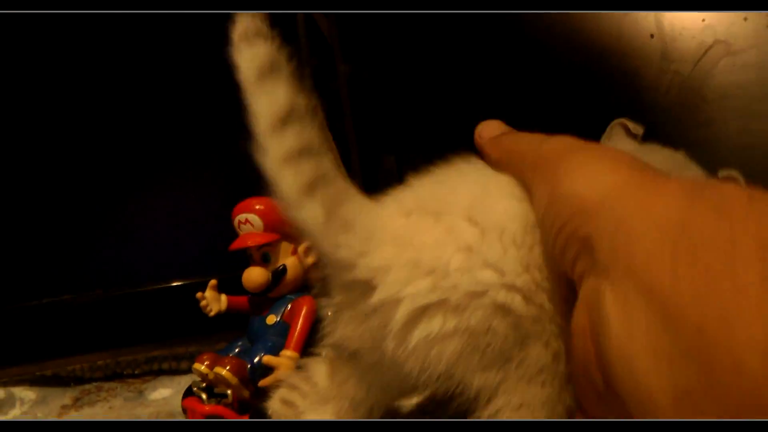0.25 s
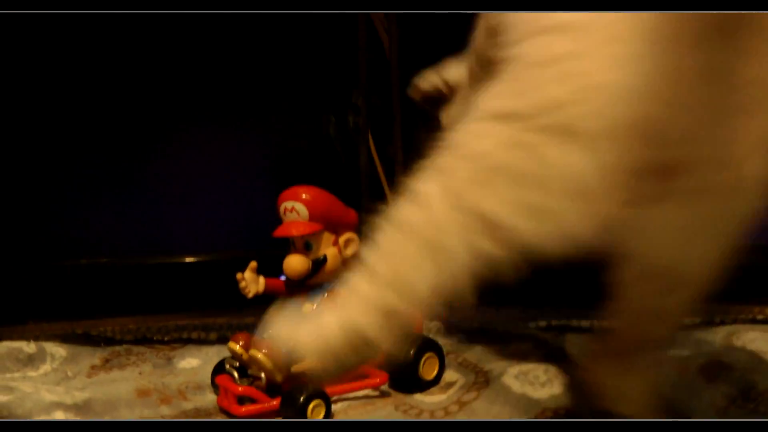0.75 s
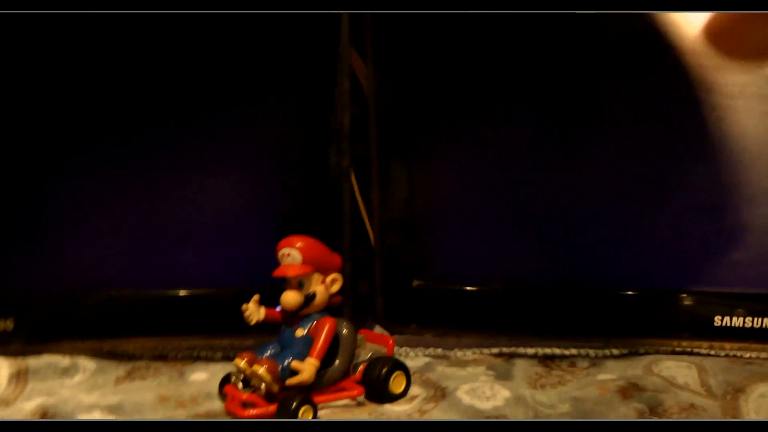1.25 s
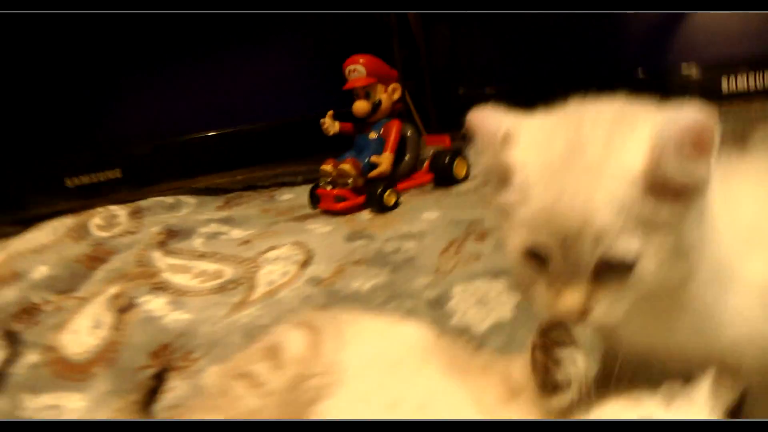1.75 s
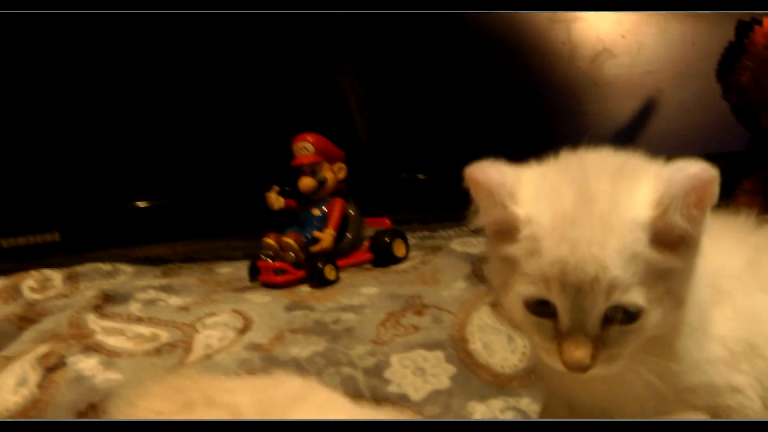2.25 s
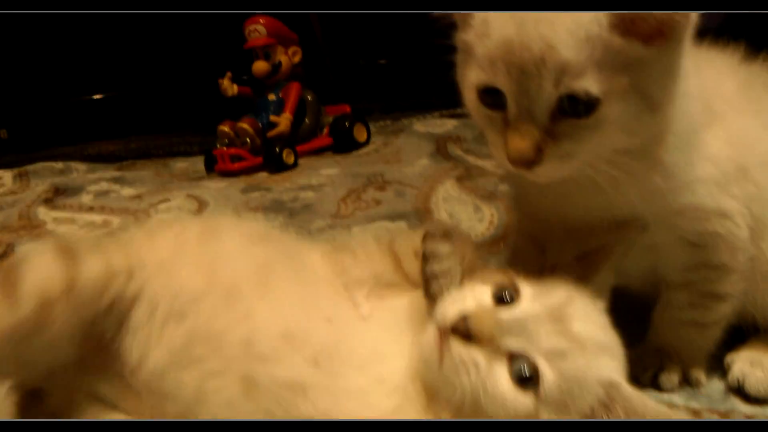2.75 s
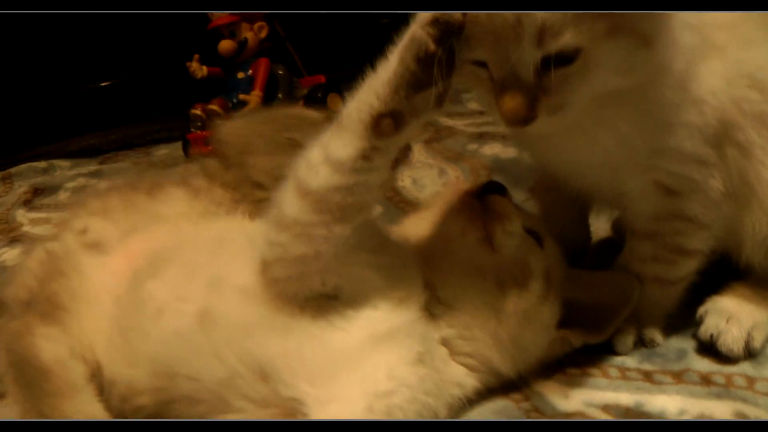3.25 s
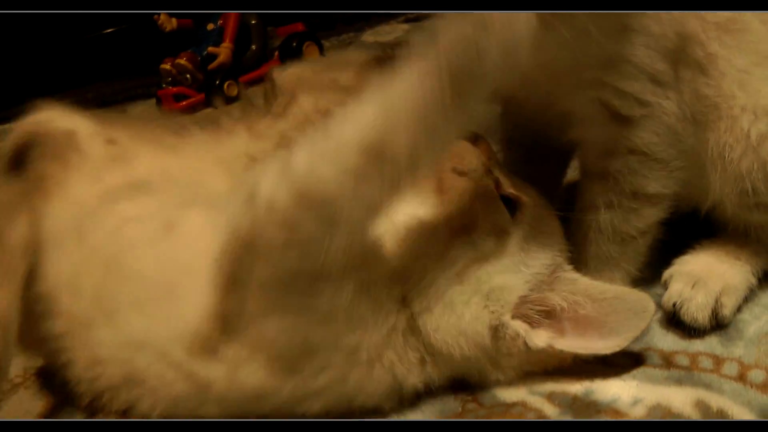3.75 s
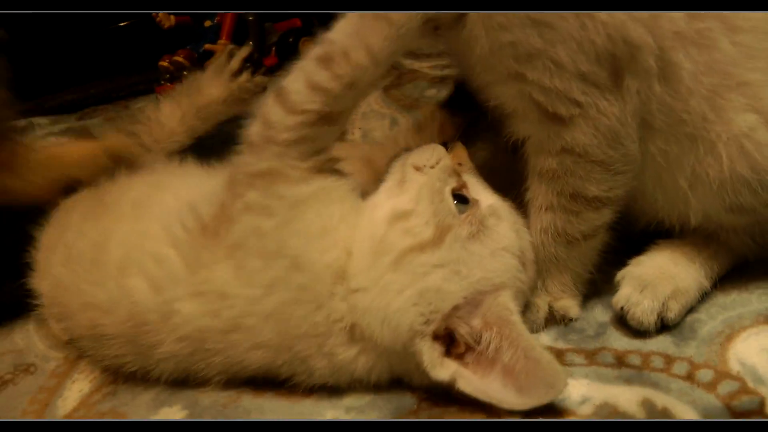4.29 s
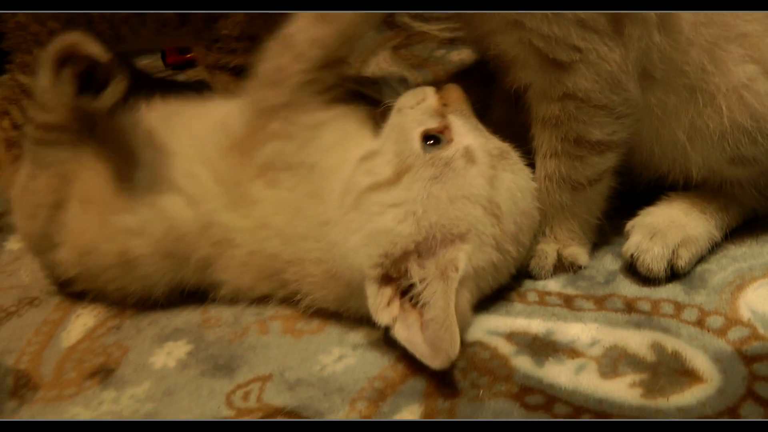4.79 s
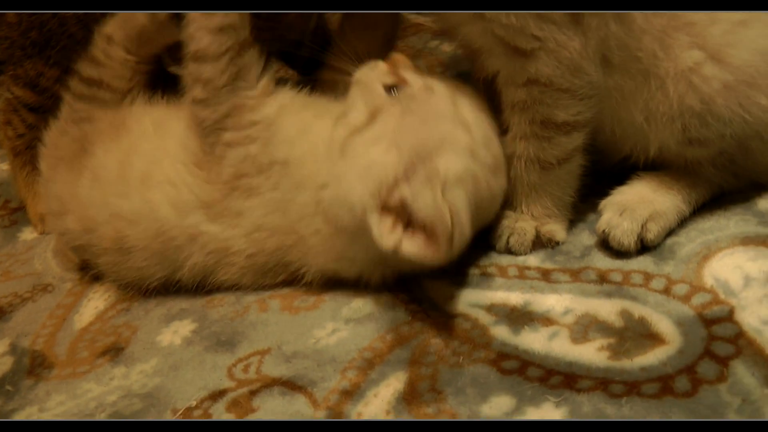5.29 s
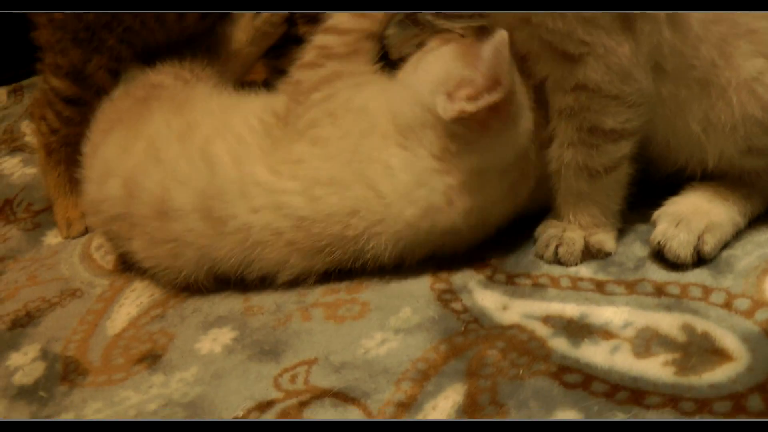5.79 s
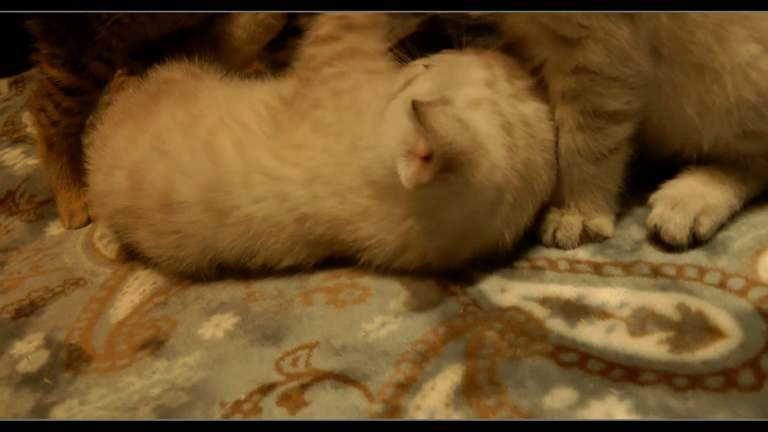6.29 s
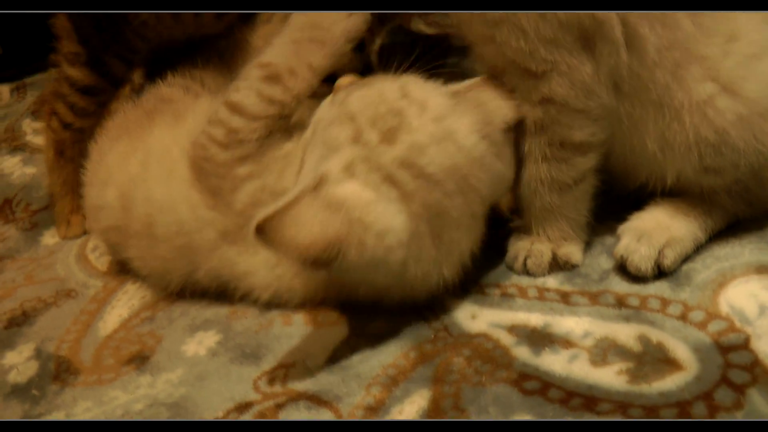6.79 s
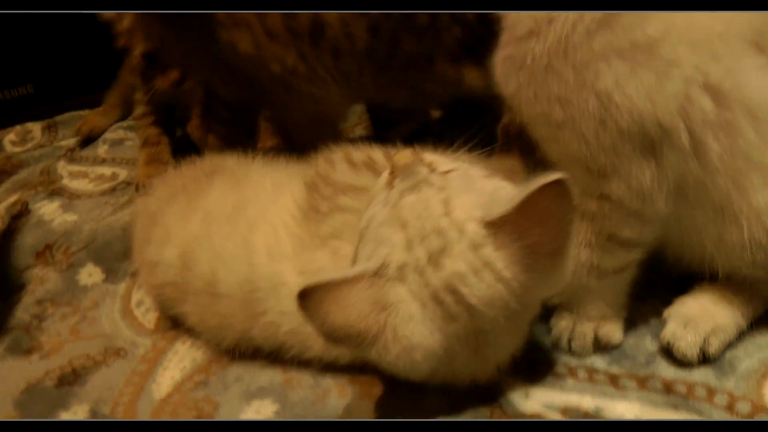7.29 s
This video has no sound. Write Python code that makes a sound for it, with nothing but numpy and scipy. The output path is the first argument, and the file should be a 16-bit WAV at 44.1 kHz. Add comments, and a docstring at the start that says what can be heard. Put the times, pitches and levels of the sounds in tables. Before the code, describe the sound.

Close up in a small room, over a faint steady hiss, soft paw steps end in a dull landing on a bed. A short scrape and two knocks of camera handling follow. Then kittens wrestle on the bedspread, with uneven fur rustles, muffled thumps and little taps. Sharper bursts of claws snagging cloth stand out later and again just before the end.

```python
"""Kittens tussling on a bedspread

In a small room, close to a hand-held camera, bodies thump the mattress and excite its low modes.
Paws and claws strike and catch in short, damped bursts; fur sliding over cloth makes friction noise.
A hand rubs and knocks the camera's shell. A steady hiss lies underneath, and above the bass the
two microphone channels are largely opposed in phase."""
import sys
import numpy as np
from scipy import signal
from scipy.fft import rfft, irfft
from scipy.io import wavfile
from scipy.ndimage import uniform_filter1d

SR = 44100
rng = np.random.default_rng(int(sys.argv[2]) if len(sys.argv) > 2 else 0)


def materialize(psi):
    """Save the field psi as 16-bit PCM at rate SR to the path in sys.argv[1].

    A 1-D psi becomes a single channel; in a 2-D psi each row is a channel.
    """
    bounded = np.clip(np.atleast_2d(psi).T, -1, 1)
    quanta = np.round(bounded * 32767).astype(np.int16)
    wavfile.write(sys.argv[1], SR, quanta)


N = 332514
STROKE_SKEW = 0.67  # below 1, a slide gains speed quickly and slows gradually


def undb(db):
    """Amplitude ratio of a level in decibels."""
    return 10 ** (np.asarray(db) / 20)


def unit(x):
    """Normalisation to an rms of 1."""
    return x / np.sqrt(np.mean(x ** 2) + 1e-18)


def curve(points, size):
    """Interpolation of (frequency_hz, value) points on a log axis, at the bins of a transform."""
    hz, value = np.transpose(points)
    return np.interp(np.log(np.fft.rfftfreq(size, 1 / SR) + 1), np.log(np.sort(hz)), value)


def colour(x, points):
    """Minimum-phase filtering to a given spectral shape; white noise keeps its power."""
    size = 2048
    cepstrum = irfft(np.log(unit(undb(curve(points, size)))))
    cepstrum[1:size // 2] *= 2
    cepstrum[size // 2 + 1:] = 0
    return signal.fftconvolve(x, irfft(np.exp(rfft(cepstrum))))[:len(x)]


def resonate(x, hz, width_hz):
    """A second-order resonance with unit gain at its centre."""
    return signal.lfilter(*signal.iirpeak(hz, hz / width_hz, fs=SR), x)


def fade(t, t60):
    """Exponential decay, by 60 dB in t60 seconds."""
    return np.exp(-np.log(1000) * t / max(t60, 1e-3))


def add(track, start_s, sound):
    """Superposition of a sound on a track."""
    i = max(int(start_s * SR), 0)
    track[i:i + len(sound)] += sound[:max(N - i, 0)]


def grains(size, spread_db):
    """Stick-slip friction: noise whose level scatters from one snag to the next."""
    snags = np.repeat(rng.standard_normal(size // 64 + 1), 64)[:size]
    return unit(rng.standard_normal(size) * undb(spread_db * snags))


def walk(rate_hz):
    """Slow random modulation: smoothed steps with a spread near 1."""
    hold = int(SR / rate_hz)
    steps = np.repeat(rng.standard_normal(N // hold + 1), hold)
    return 1.58 * uniform_filter1d(uniform_filter1d(steps, hold), hold)[:N]


def stroke(length_s, skew):
    """Speed of one sliding movement: a skewed half sine."""
    return np.sin(np.pi * np.linspace(0, 1, max(int(length_s * SR), 8)) ** skew)


def pair(x, balance):
    """Unequal frequency responses of two channels, with a mean power gain of 1."""
    gains = undb(np.array([[.5], [-.5]]) * curve(balance, N))
    return irfft(rfft(x) * gains / np.sqrt(np.mean(gains ** 2, axis=0)), N)


def hiss():
    """Room tone and microphone hiss: a weak in-phase (mid) and a stronger antiphase (side) noise."""
    # frequency_hz, density_db
    mid_spectrum = [(25, -11), (60, -12), (110, -4), (185, 0), (300, -3), (600, -3.5), (1000, -3.5),
                    (2000, -8.5), (4000, -13.5), (7000, -12), (9500, -18), (11600, -22), (12500, -48)]
    side_spectrum = [(25, -11), (60, -9), (130, -9.5), (210, -9.5), (330, -6.5), (520, -0.5), (900, 0),
                     (1500, -5), (2500, -12), (4000, -18), (7000, -23), (11600, -27.5), (12500, -60)]
    # channel balance: frequency_hz, left_minus_right_db
    balance = [(100, -1), (1500, 0.5), (4000, -6), (8500, -9), (11000, -32)]
    mid = unit(colour(rng.standard_normal(N), mid_spectrum)) * undb(-54.03)
    side = unit(colour(rng.standard_normal(N), side_spectrum)) * undb(-46.0 + 0.74 * walk(rate_hz=3.8))
    return pair(np.array([mid + side, mid - side]), balance)


def room(x, early_db, tail_db, t60):
    """Reverberation: early reflections from furniture and a diffuse tail, unique to each microphone."""
    t = np.arange(SR // 2) / SR
    channels = []
    for _ in range(2):
        early = rng.standard_normal(len(t)) * fade(t, 0.08) * (t > .001)
        tail = rng.standard_normal(len(t)) * fade(t, t60) * (t > .008)
        response = undb(early_db) * early / np.linalg.norm(early)
        response += undb(tail_db) * tail / np.linalg.norm(tail)
        channels.append(signal.fftconvolve(x, response)[:N])
    return np.array(channels)


def grip():
    """Forced vibration: sliding skin drives the camera's shell and also hisses into the microphones."""
    # slides of the hand: start_s, length_s, friction_db, direct_relative_db
    slides = [(1.605, 0.067, -46.5, 6), (1.624, 0.22, -61, 13.5), (1.733, 0.071, -33.5, -1),
              (1.745, 0.033, -28, -16), (1.799, 0.15, -60, 13)]
    # shell resonances: centre_hz, width_hz, relative_db
    modes = [(790, 185, -3), (1200, 260, -9), (1395, 300, -5)]
    friction, direct = np.zeros((2, N))
    for start_s, length_s, db, direct_db in slides:
        speed = stroke(length_s, STROKE_SKEW)
        add(friction, start_s, undb(db) * speed * grains(len(speed), spread_db=2.0))
        add(direct, start_s, undb(db + direct_db) * speed * grains(len(speed), spread_db=3.0))
    shell = sum(undb(db) * resonate(resonate(friction, hz, width), hz, width) for hz, width, db in modes)
    return undb(22.0) * shell + direct


def squirm():
    """Amplitude envelope of wriggling: each bout flares up and tires, in uneven jerks."""
    # bouts on the cloth: start_s, length_s, level_db
    bouts = [(1.805, 0.36, -60), (2.55, 0.78, -55), (3.021, 1.64, -47.5), (4.456, 0.69, -54),
             (5.95, 1.14, -54)]
    effort = np.zeros(N)
    for start_s, length_s, db in bouts:
        add(effort, start_s, undb(db) * stroke(length_s, skew=0.43))
    return effort * undb(3.5 * walk(rate_hz=25))


def rustle():
    """Friction noise grows with speed: fur drags the cloth (dull) and plucks its fibres (bright)."""
    # sweeps of fur and paws: start_s, length_s, level_db, treble_relative_db
    sweeps = [(0.611, 0.028, -42.5, -6), (0.884, .09, -71.5, 14), (1.29, .02, -60, 7.5),
              (2.492, 0.066, -40, -14.5), (3.119, 0.21, -41.5, -3), (3.443, 0.13, -53, -3),
              (3.99, 0.036, -49, -5), (4.212, .049, -65, 19), (4.577, 0.029, -58.5, 11),
              (4.826, 0.054, -65, 17), (4.918, 0.053, -51.5, 7.5), (5.203, .12, -43.5, 1),
              (5.432, 0.049, -59.5, 9), (5.662, 0.056, -60, 11.5), (5.754, .026, -41, -9),
              (5.782, 0.031, -35.5, -6), (5.811, 0.021, -43, 10), (5.827, 0.1, -31.5, -5.5),
              (5.96, 0.11, -49.5, -0.5), (6.612, .17, -47.5, -16), (6.772, 0.042, -43.5, -3),
              (7.35, .03, -43, 0), (7.379, 0.13, -55.5, 7), (7.489, .046, -58, 13)]
    # frequency_hz, density_db
    cloth_spectrum = [(60, -17.5), (140, -4), (280, 1.5), (520, -3.5), (750, -3), (1200, -4.5), (2200, -12),
                      (5000, -46), (12000, -36)]
    fibre_spectrum = [(500, -30), (1500, 0.5), (2800, 4.5), (5500, 3), (8000, -4), (12000, -18)]
    drag = squirm()
    pluck = drag * undb(-7)
    for start_s, length_s, db, treble_db in sweeps:
        speed = undb(db) * stroke(length_s, STROKE_SKEW)
        add(drag, start_s, speed)
        add(pluck, start_s, speed * undb(treble_db))
    cloth = colour(drag * grains(N, spread_db=0.0), cloth_spectrum)
    fibres = colour(pluck * grains(N, spread_db=2.0), fibre_spectrum)
    return cloth + fibres


def thumps():
    """Modal vibration: a soft landing excites the bed's low modes, most of all those near one pitch."""
    # weight landing on the bed: start_s, level_db, favoured_hz
    landings = [(1.2055, -10.5, 198), (1.281, -30, 138), (1.744, -40, 115), (2.501, -42, 169),
                (3.168, -23, 302), (3.224, -26.5, 270), (3.488, -40, 240), (3.613, -33, 241),
                (3.824, -32, 180), (3.987, -27, 177), (4.817, -26.5, 102), (5.247, -38.5, 188),
                (5.766, -25.5, 111), (5.856, -27.5, 133), (6.52, -27, 185), (6.703, -37, 172),
                (6.796, -33, 200), (7.230, -38, 134), (7.275, -33, 115)]
    # modes of the bed: pitch_hz, relative_db, t60_s
    modes = [(72.4, 4, 0.26), (115.7, -4, 0.24), (126.4, -1, 0.36), (180.3, 1.5, 0.18), (226, 7, 0.061),
             (287, 6.5, 0.17), (353, 16, 0.051)]
    reach_octaves, pitch_scatter, sink_s, settle_s = 0.31, 0.022, 0.00089, 0.07
    bed, t = np.zeros(N), np.arange(SR // 2) / SR
    # the weight sinks in, then the body settles and smothers the ring
    envelope = (1 - np.exp(-t / sink_s)) / (1 + (t / settle_s) ** 2)
    for start_s, level_db, spot_hz in landings:
        weights = [undb(db) / (1 + (np.log2(hz / spot_hz) / reach_octaves) ** 2) for hz, db, _ in modes]
        detunings = 1 + pitch_scatter * rng.standard_normal(len(modes))
        ring = sum(weight * np.sin(2 * np.pi * hz * detune * t) * fade(t, t60)
                   for weight, detune, (hz, _, t60) in zip(weights, detunings, modes))
        add(bed, start_s, undb(level_db) * ring * envelope / np.linalg.norm(weights))
    # a small patch of mattress radiates little deep bass
    return signal.sosfilt(signal.butter(2, 100, "highpass", fs=SR, output="sos"), bed)


def blows():
    """Impacts as rows: start_s, level_db, ring_hz, scratch_relative_db, rise_s, t60_s, ring_relative_db."""
    # soft paw steps: start_s, level_db, ring_hz, ring_relative_db
    steps = [(0.288, -42.5, 935, 15), (0.623, -36, 678, 6.5), (0.812, -52, 478, 11),
             (1.2055, -37.5, 625, 15.5), (2.498, -41, 682, 13), (3.226, -35, 540, 7),
             (3.381, -45.5, 460, 11), (3.489, -31.5, 548, 3), (3.610, -35, 587, -2),
             (3.822, -44.5, 480, 11), (3.917, -34.5, 1260, 6.5), (3.983, -37.5, 487, 16),
             (6.518, -32, 488, 12.5), (6.559, -37, 850, 6.5), (6.665, -40.5, 467, 7.5),
             (6.791, -42, 449, 9)]
    # claws catching in cloth: start_s, level_db, ring_hz, scratch_relative_db, rise_s, t60_s
    catches = [(0.543, -39, 786, 1.5, 0.00064, 0.039), (3.162, -25.5, 1160, 0.5, 0.0024, 0.069),
               (3.648, -36, 1013, 1, 0.00045, 0.053), (4.812, -32.5, 1000, -2, 0.00069, 0.039),
               (5.763, -22.5, 1150, -4, 0.0014, 0.047), (5.7705, -13.5, 780, -21, 0.00035, 0.042),
               (5.828, -28.5, 784, 2.5, .0009, 0.063), (5.852, -19.5, 730, -10, .0005, 0.062),
               (5.8839, -21, 675, -9, 0.0003, .06), (5.9552, -28.5, 1430, 1, .0005, 0.071),
               (7.229, -37.5, 1083, -3, .002, 0.096), (7.270, -19, 935, -6.5, 0.0026, 0.058),
               (7.289, -33.5, 934, 5.5, 0.00077, 0.071), (7.3367, -17.5, 950, 10, 0.0013, 0.034),
               (7.3674, -26, 993, 4, 0.00072, 0.065)]
    # fingers knocking the camera: start_s, level_db
    knocks = [(1.6321, -25), (1.8306, -18.5)]
    ring_cycles = 46  # a step dies away in this many periods; its claws barely touch
    paws = [(start_s, db, hz, -8, .0014, ring_cycles / hz, ring_db) for start_s, db, hz, ring_db in steps]
    claws = [(*catch, 1.5) for catch in catches]
    fingers = [(start_s, db, 1425, -11, 0.00075, 0.023, 4.5) for start_s, db in knocks]
    return paws + claws + fingers


def taps(flutter_depth):
    """Impact excitation: each blow gives a dull pad sound, a scratch, a tick and a damped ring."""
    # frequency_hz, density_db
    pad_spectrum = [(60, -8.5), (150, -15), (280, 0.5), (600, 4.5), (1100, 0.5), (1700, -6.5),
                    (2600, -22.5), (6000, -52)]
    scratch_spectrum = [(600, -34), (1400, 7), (2200, 9), (3200, 4.5), (5000, -5), (6700, -9.5),
                        (8000, -30)]
    tick_spectrum = [(2000, 4), (4000, -5), (5400, 7), (6700, 2), (8000, -5), (12000, -14.5)]
    reference_db, tick_offset_db, tick_slope = -30, -9.5, 0.72
    pad, scratch, tick, ring = np.zeros((4, N))
    t = np.arange(SR // 4) / SR
    for start_s, db, hz, scratch_db, rise_s, t60, ring_db in blows():
        force = (1 - np.exp(-t / rise_s)) * fade(t, t60)
        # the tip's tick grows with the scratch, but more slowly
        tick_db = reference_db + tick_offset_db + tick_slope * (db + scratch_db - reference_db)
        add(pad, start_s, force * undb(db) * grains(len(t), spread_db=-0.5))
        add(scratch, start_s, force * undb(db + scratch_db) * grains(len(t), spread_db=6.0))
        add(tick, start_s, force * undb(tick_db) * grains(len(t), spread_db=6.0))
        # the struck spot's pitch flutters as the load on it shifts
        flutter = flutter_depth * unit(uniform_filter1d(rng.standard_normal(len(t)), size=90))
        phase = 2 * np.pi * np.cumsum(hz * (1 + flutter)) / SR
        add(ring, start_s, force * undb(db + ring_db) * np.sin(phase))
    noise = colour(pad, pad_spectrum) + colour(scratch, scratch_spectrum) + colour(tick, tick_spectrum)
    return noise + ring


def contacts():
    """Superposition of taps and friction, with fresh noise at each call."""
    return taps(flutter_depth=0.059) + rustle() + grip()


def scene(own_share=0.16):
    """Superposition: direct and reverberant sound add in two channels that differ in phase and level."""
    # phase between the channels: frequency_hz, left_lead_rad
    phase_lead = [(60, 1.1), (170, 0.6), (300, -2), (500, -3.5), (1000, -4.5), (2500, -4.5), (6000, -5.5),
                  (12000, -3.5)]
    # channel balance, the left duller in the top treble: frequency_hz, left_minus_right_db
    balance = [(90, 11.5), (180, 2.5), (280, -10), (600, -11), (1200, -2), (3000, -9.5), (8000, -9.5),
               (11000, -23)]
    near, bass = contacts(), thumps()
    # fibres snag all over the cloth, so the left microphone hears some that the right does not
    left = np.sqrt(1 - own_share) * near + np.sqrt(own_share) * contacts() + bass
    left = irfft(rfft(left) * np.exp(1j * curve(phase_lead, N)), N)
    direct = np.array([left, near + bass])
    reflected = room(near + undb(-9) * bass, early_db=-12.5, tail_db=-14.0, t60=0.34)
    return pair(direct + reflected, balance) + hiss()


def record(dry):
    """Band limiting: the camera's steep low-pass filter removes the top of the treble."""
    cutoff_hz = 12250
    return signal.sosfilt(signal.ellip(8, .2, 70, cutoff_hz, fs=SR, output="sos"), dry)


dry = scene()
out = record(dry)
materialize(out)
```